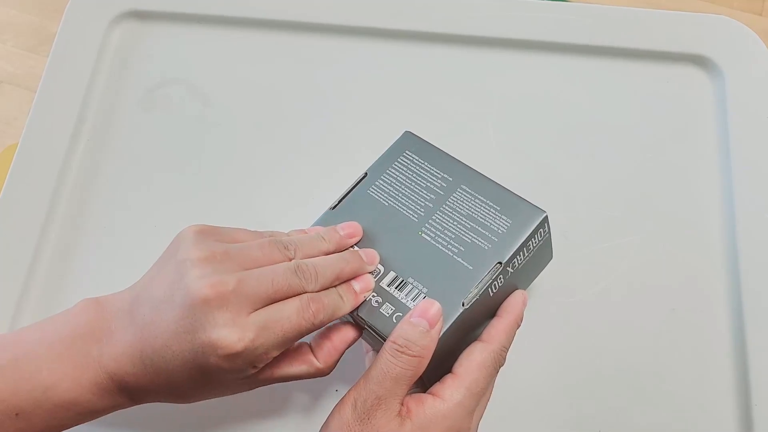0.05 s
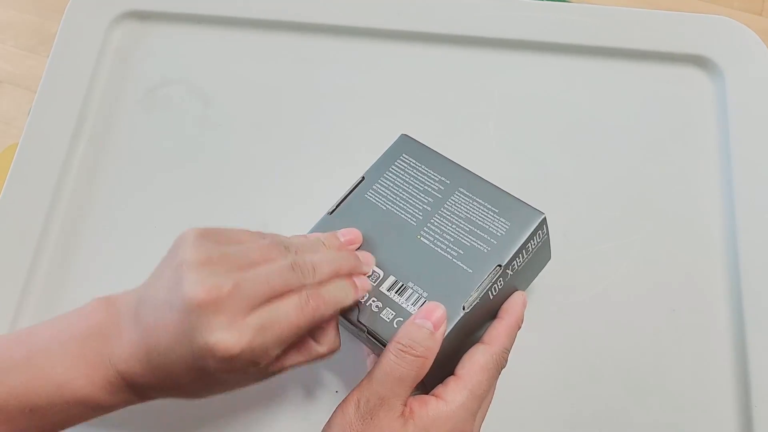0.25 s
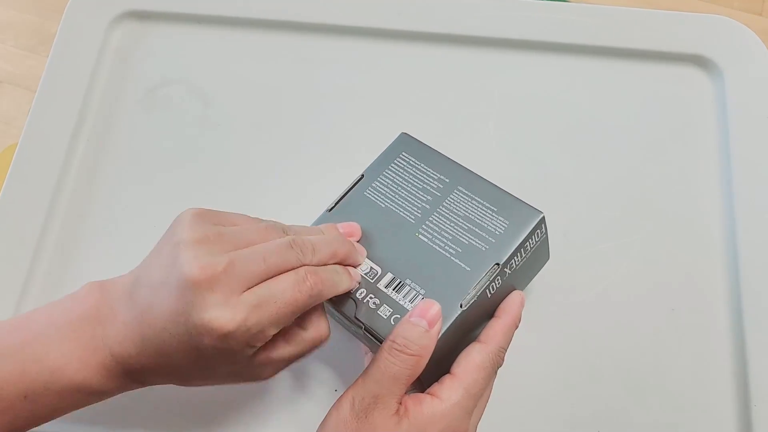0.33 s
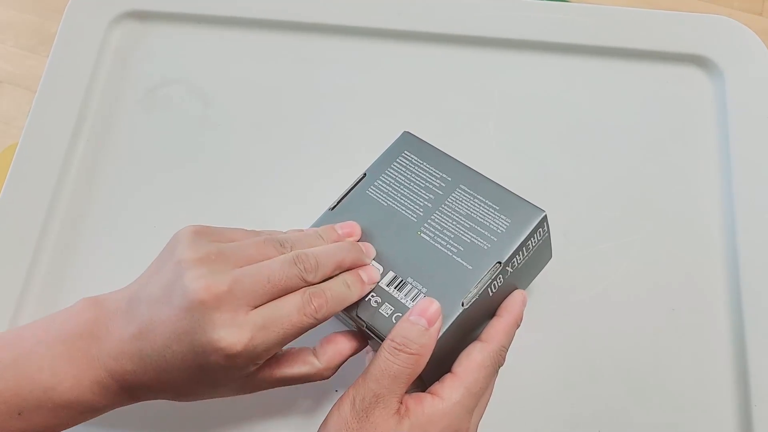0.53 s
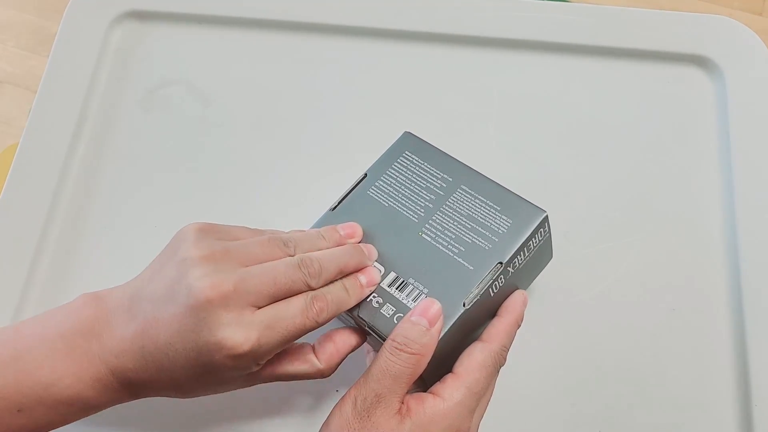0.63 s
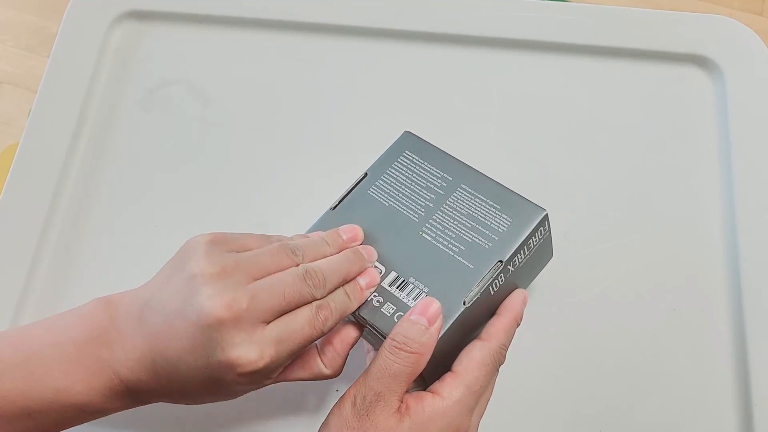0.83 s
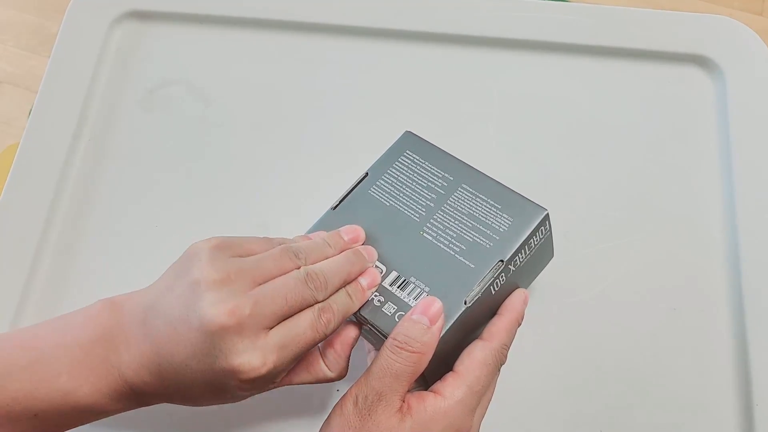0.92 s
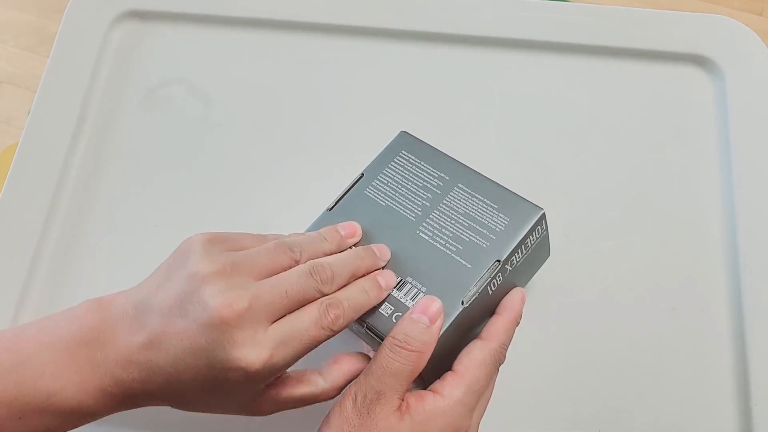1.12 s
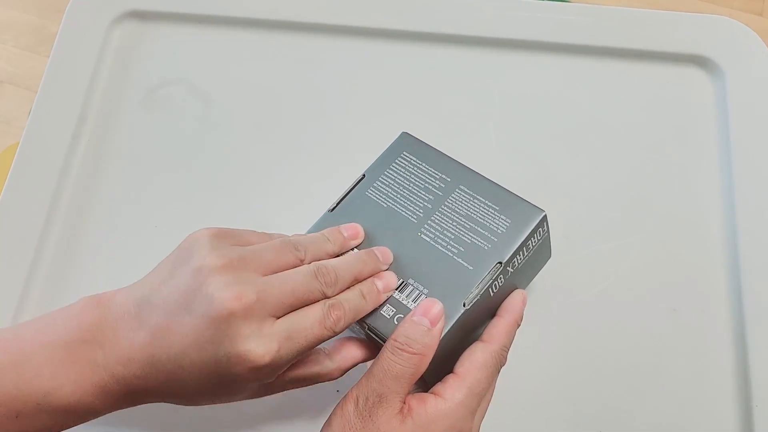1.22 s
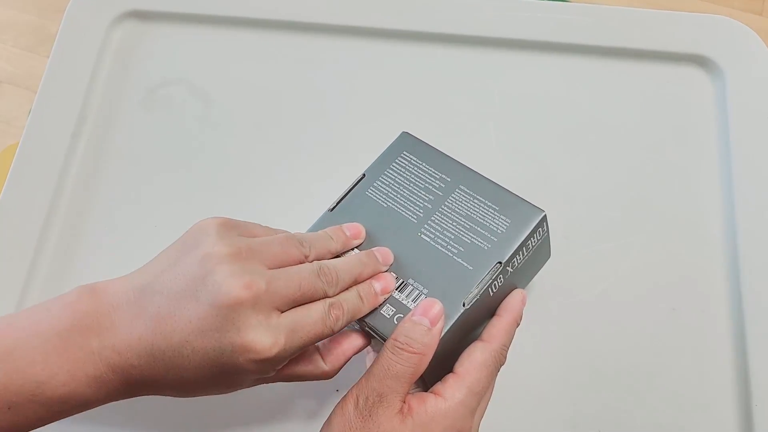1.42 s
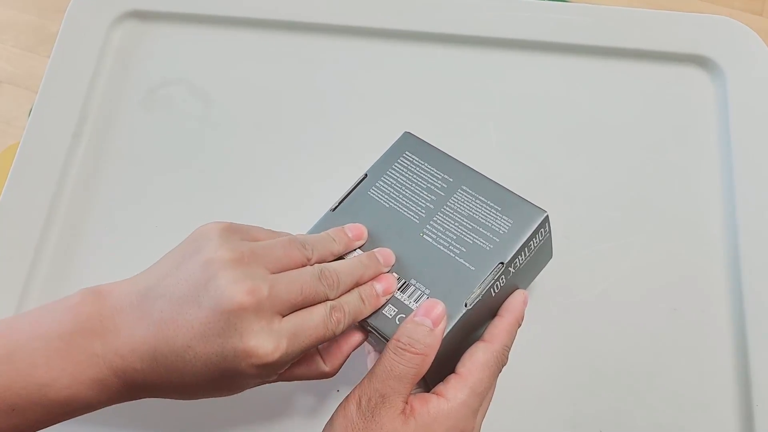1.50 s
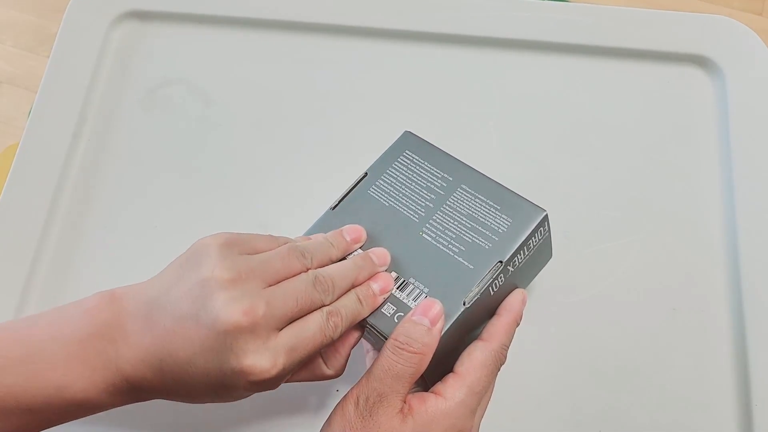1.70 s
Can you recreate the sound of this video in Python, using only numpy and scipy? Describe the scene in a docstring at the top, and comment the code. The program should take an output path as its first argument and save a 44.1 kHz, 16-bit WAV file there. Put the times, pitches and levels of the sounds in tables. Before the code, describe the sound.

Two hard fingernail snaps on the seal of a small cardboard box, very close and overloading the microphone, with light taps and soft skin rubbing between and after them, in a faintly humming room.

```python
"""Fingers rub softly on card in a faintly humming room, then a nail snaps off the seal of a small cardboard box.
Close to a microphone pair, two such snaps overload the input; between and after them come soft taps and rubbing.
Each blow is a short force ringing decaying modes of box, tray and seal edge, plus a burst of noise for the crack.
The rub is shaped noise grains, the held box shaped rumble; a banded noise tail is the room's answer."""
import sys
import numpy as np
from scipy import signal
from scipy.fft import rfft, irfft
from scipy.io import wavfile

SR = 44100
rng = np.random.default_rng(int(sys.argv[2]) if len(sys.argv) > 2 else 0)


def dump_mix(stems):
    """Bounce the given channels to the path in sys.argv[1] as a 16-bit WAV at rate SR."""
    frames = np.atleast_2d(stems).T  # one column per channel
    limited = np.clip(frames, -1, 1)  # hard clip at full scale
    pcm = np.round(limited * 32767).astype(np.int16)
    wavfile.write(sys.argv[1], SR, pcm)


N = 77175


def undb(db):
    """Turn decibels into an amplitude factor."""
    return 10 ** (np.asarray(db) / 20)


def unit(x):
    """Scale to an RMS of one, over all channels together."""
    return x / np.sqrt(np.mean(x ** 2))


def stereo(mid, side):
    """Left is mid plus side, right is mid minus side."""
    return mid + side * np.array([[1], [-1]])


def colour(x, points):
    """Filter by (frequency [Hz], level [dB]) points: -80 dB below the first, the last level held above."""
    hz, db = np.array(points, float).T
    f = np.log(np.fft.rfftfreq(x.shape[-1], 1 / SR) + 1)
    gain = undb(np.interp(f, np.log(hz), db, left=-80))
    return irfft(rfft(x) * gain, x.shape[-1])


def ring(modes, stretch, t):
    """Sum of sines, each losing 60 dB in its own t60 times the stretch."""
    hz, db, t60 = np.array(modes).T[:, :, None]
    decay = np.exp(-np.log(1000) * t / (t60 * stretch))
    return np.sum(undb(db) * np.sin(2 * np.pi * hz * t) * decay, axis=0)


AIR_DB, AIR_WIDE_HZ = -57.5, 869  # RMS level of the mid; corner below which the sides grow alike
# Spectrum of the room's own hum and hiss: (frequency [Hz], relative level [dB per Hz])
AIR_SPECTRUM = [(20, -32.5), (42, -9), (62, 3), (90, -34.5), (150, -14), (300, -26), (480, -18.5),
                (750, -17), (1050, -26.5), (1500, -40.5), (2200, -51), (6000, -53.5), (10000, -51.5),
                (13000, -47), (16000, -57)]


def room_air():
    """Quiet hum and hiss of the place: shaped noise, alike on both sides in the bass."""
    mid, side = colour(rng.standard_normal((2, N)), AIR_SPECTRUM)
    side = signal.lfilter(*signal.butter(1, AIR_WIDE_HZ, "high", fs=SR), side)
    return undb(AIR_DB) * stereo(mid, side) / np.std(mid)


ROOM_DELAY_S, ROOM_RISE_S = .004, .006
# Room tail by band: (centre [Hz], level [dB], t60 [s], side minus mid [dB])
ROOM_BANDS = [(60.2, -39.5, 0.35, 2), (132, -24.5, 0.96, -15), (240, -24.5, .55, -14.5),
              (485, -18.5, 0.58, -6.5), (800, -17.5, 0.49, 0.5), (1503, -20, 0.63, 2.3),
              (2480, -15, .55, -1.75), (4500, -19, 0.58, 1.4), (7600, -20, 0.47, -0.8),
              (12500, -22, .36, -4), (15000, -18.5, 0.25, 6.1), (16300, -43, .2, -0.7)]


def room_tail(x):
    """Diffuse answer of the walls: noise in overlapping bands, each with its own decay and width."""
    t = np.arange(SR) / SR
    f = np.log(np.fft.rfftfreq(SR, 1 / SR) + 1)
    centres = np.log(np.array(ROOM_BANDS)[:, 0])
    spectra, tail = rfft(rng.standard_normal((2, SR))), 0
    for k, (_, db, t60, side_db) in enumerate(ROOM_BANDS):
        band = np.interp(f, centres, np.arange(len(ROOM_BANDS)) == k)
        mid, side = irfft(spectra * band, SR)
        decay = np.exp(-np.log(1000) * t / t60)
        tail = tail + undb(db) * decay * stereo(mid, undb(side_db) * side)
    tail = tail * np.clip((t - ROOM_DELAY_S) / ROOM_RISE_S, 0, 1) / 10
    return signal.fftconvolve(x[None], tail, axes=1)[:, :N]


RUMBLE_SIDE_DB = -10
# Level of the rubbing hand: (time [s], card rustle level [dB], held-box rumble level [dB])
RUB_LEVELS = [(0, -52, -54.5), (.05, -57.5, -47.5), (.09, -58.5, -52), (.14, -78.5, -47), (.2, -68, -48.5),
              (.3, -46.5, -35), (.44, -54.5, -56), (0.518, -52, -41.5), (.61, -68.5, -66),
              (0.651, -58, -49), (.7, -49.5, -42), (0.758, -56.5, -57.5), (.86, -66, -48),
              (1.052, -33.5, -47), (1.18, -63.5, -66), (1.28, -54, -62.5), (1.311, -53.5, -49),
              (1.38, -64, -52.5), (1.46, -64, -56.5), (1.501, -67, -60.5), (1.75, -67, -65.5)]
# Spectrum of the held box: (frequency [Hz], level [dB])
RUMBLE_SPECTRUM = [(25, -17), (45, -17), (62, 23.5), (85, 4.5), (140, 7), (200, 9), (300, -39.5)]


def box_rumble():
    """The held box rumbles: low noise following the hand, nearly alike on both sides."""
    s, _, rumble_db = np.array(RUB_LEVELS).T
    level = undb(np.interp(np.arange(N) / SR, s, rumble_db))
    mid, side = unit(colour(rng.standard_normal((2, N)), RUMBLE_SPECTRUM)) * level
    return stereo(mid, undb(RUMBLE_SIDE_DB) * side)


GRAINS_PER_S, GRAIN_SPREAD_DB = 1800, 1.5
# Spectrum of skin on card: (frequency [Hz], level [dB])
RUSTLE_SPECTRUM = [(100, -8), (250, -3), (500, 0), (900, -3), (1400, -12), (2500, -24), (6000, -36),
                   (16000, -42)]


def finger_rub():
    """Skin slips over the card in small uneven grains, at random times and strengths."""
    s, rustle_db, _ = np.array(RUB_LEVELS).T
    chance = rng.random((2, N))
    slips = chance[0] < GRAINS_PER_S / SR
    strength = undb(-GRAIN_SPREAD_DB * np.log(chance[1] + 1e-9))
    grains = slips * rng.standard_normal(N) * strength
    return unit(colour(grains, RUSTLE_SPECTRUM)) * undb(np.interp(np.arange(N) / SR, s, rustle_db))


# Modes of the stiff seal edge: (frequency [Hz], level [dB], t60 before a slight shortening [s])
SEAL_MODES = [(2487, 9.5, .011), (3144, -20.5, .008), (4780, -3, 0.0095), (7400, 0.5, 0.0048),
              (14020, 6, 0.0044)]
SEAL_MAX_DB = -12  # a light touch cannot ring the edge louder than this, relative to the blow


def seal_edge(db, crack_db, ms, t):
    """The seal edge rings from the middle of the contact, as loud as the crack up to a limit."""
    release = np.arange(400) == int(ms * SR / 2000)  # one pulse, half the contact time in
    edge = np.convolve(ring(SEAL_MODES, 0.98, t), release)[:len(t)]
    return undb(min(crack_db, db + SEAL_MAX_DB)) * edge


CRACK_S, CRACK_TAIL_S, CRACK_TAIL_DB, CRACK_SIDE_DB = .0005, .004, -8, -3.5
# Spectrum of the paper crack: (frequency [Hz], level [dB])
CRACK_SPECTRUM = [(300, -55), (1500, 7.5), (3000, -5), (6000, -6.5), (9000, -7.5), (13000, -3.5),
                  (15000, -8), (16500, -25.5)]


def paper_crack(crack_db, hiss, t):
    """Tearing paper: a sharp noise burst with a weaker tail, returned as mid and side."""
    burst = np.exp(-t / CRACK_S) * (t / CRACK_S) * np.e
    burst = burst + undb(CRACK_TAIL_DB) * np.exp(-t / CRACK_TAIL_S)
    mid, side = undb(crack_db) * burst * unit(colour(hiss, CRACK_SPECTRUM))
    return mid, undb(CRACK_SIDE_DB) * side


FAR_RING = 0.097  # share of the ring time that carries into the room
FAR_AIR_DB = -8.5  # the box air note, as the walls get it
# Box modes: (frequency [Hz], level [dB], t60 before each blow's factor [s]); the first is the air inside
BOX_MODES = [(439.4, -1.5, 0.23), (523.3, 0.5, .04), (662.4, -14, 0.15), (696, -2.5, 0.035),
             (751, 4.5, 0.017), (934.7, 4, 0.022), (1140, -7.5, 0.059), (1465, -27.5, 0.0083),
             (1670, -18.5, 0.013)]
# Tray and table modes: (frequency [Hz], level [dB], t60 before each blow's factor [s])
TRAY_MODES = [(63.6, -22, 0.41), (95, -16.5, 0.06), (139.6, -14.5, 0.16), (157, -21.5, 0.12),
              (205.4, -19.5, 0.41), (231.6, -12, 0.11)]
# Nail blows: (time [s], level [dB], contact [ms], paper crack level [dB], ring length [factor],
# tray thump relative to the blow [dB], change of the box air mode [dB])
NAIL_BLOWS = [(0.1999, -30, 1.78, -68, .5, -6, 9), (0.2042, 2, 1.474, -12, 0.62, -7.2, -5),
              (0.4394, -33.5, 0.89, -67, 1.3, 0.5, -30), (.4432, -31, 1.04, -57.5, 0.25, -5.5, 5.8),
              (0.4979, -25.5, 3.65, -65.5, 0.16, 3, 2), (0.538, -46.5, 1.18, -62, .6, 9.5, .1),
              (.636, -41, 2.4, -71, 1.8, 8.9, -0.7), (0.6663, -30, 0.86, -53.5, 0.32, .1, -6.6),
              (0.674, -40.5, 2.9, -58.5, .4, 0, -1), (.6765, -35.5, 0.84, -55, .6, 7.1, 6.3),
              (.7428, -31.5, 1.1, -62, 0.85, 5.8, 2.5), (0.8917, -32, 0.94, -68.5, .6, 8.5, 4.3),
              (.8965, 2.5, 1.06, -12, 0.55, -10.5, -10.5), (1.295, -36.5, 1.55, -65.5, 1.24, -6, -23.5),
              (1.317, -47.5, 1, -69.5, 0.39, -1, -15.5), (1.453, -42, 4.34, -76, 1.15, 9, -1),
              (0.692, -40, 2.1, -65.5, 0.74, 1, -3.5), (.716, -40.5, 1.9, -63.5, 0.36, -0.3, 2.5),
              (1.731, -71, 0.99, -67.5, 0.22, -0.5, 3.9)]


def nail_blows():
    """The nail loads the card and lets go, ringing the box; its push thumps the tray; the seal edge cracks.
    Returns the body sound, the crack left and right, and the shorter sound that reaches the walls."""
    out, t = np.zeros((4, 2 * N)), np.arange(SR // 2) / SR
    noise = rng.standard_normal((len(NAIL_BLOWS), 2, len(t)))
    pulse = (np.arange(len(t)) == 200).astype(float)
    click = colour(pulse, CRACK_SPECTRUM) * np.exp(-((t * SR - 200) / 80) ** 2)
    for (s, db, ms, crack_db, stretch, tray_db, air_db), hiss in zip(NAIL_BLOWS, noise):
        phase = np.clip(t[:400] / (ms / 1000), 0, 1)
        push = np.sin(np.pi * phase) ** 2
        flick = np.sin(2 * np.pi * phase) * np.sin(np.pi * phase)  # load, then let go
        air_hz, air_mode_db, air_t60 = BOX_MODES[0]
        box = [(air_hz, air_mode_db + air_db, air_t60)] + BOX_MODES[1:]

        def hit(force, modes, length):
            """Ring the modes with a force of this blow's level."""
            return np.convolve(ring(modes, length, t), force / push.sum())[:len(t)] * undb(db)

        body = hit(flick, box, stretch) + seal_edge(db, crack_db, ms, t)
        body = body + undb(tray_db) * hit(push, TRAY_MODES, stretch)
        mid, side = paper_crack(crack_db, hiss, t)
        far = hit(flick, box, FAR_RING) + undb(tray_db) * hit(push, TRAY_MODES, FAR_RING)
        far = far + undb(FAR_AIR_DB) * hit(flick, box[:1], stretch)
        # the walls get the crack as a compact click of equal energy
        far = far + click * np.sqrt(np.sum(mid ** 2) / np.sum(click ** 2))
        i = int(s * SR)
        out[:, i:i + len(t)] += [body, mid + side, mid - side, far]
    return out[:, :N]


PORT_LAG_S, PAN_DB = .00006, 1.5  # near sound reaches the right microphone later and weaker


def scene():
    """Close sound on the microphone pair, with the room's answer, the rumble and the air added."""
    rustle, rumble = finger_rub(), box_rumble()
    body, crack_left, crack_right, far = nail_blows()
    near = body + rustle
    f = np.fft.rfftfreq(N, 1 / SR)
    near_right = irfft(rfft(near) * np.exp(-2j * np.pi * f * PORT_LAG_S), N)
    left = (near + crack_left) * undb(PAN_DB / 2)
    right = (near_right + crack_right) * undb(-PAN_DB / 2)
    return np.array([left, right]) + room_tail(far + rustle) + rumble + room_air()


MIC_LOW_HZ, TOP_HZ, CLIP_KNEE = 33.6, 16300, 10  # a higher knee bends more sharply into clipping


def record(dry):
    """The microphones lose the deepest bass; the input clips at full scale; the top is cut."""
    dry = signal.lfilter(*signal.butter(2, MIC_LOW_HZ, "high", fs=SR), dry)
    clipped = dry / (1 + np.abs(dry) ** CLIP_KNEE) ** (1 / CLIP_KNEE)
    top_cut = signal.ellip(10, .2, 70, TOP_HZ, fs=SR, output="sos")
    return np.clip(signal.sosfilt(top_cut, clipped), -1, 1)


dry = scene()
out = record(dry)
dump_mix(out)
```